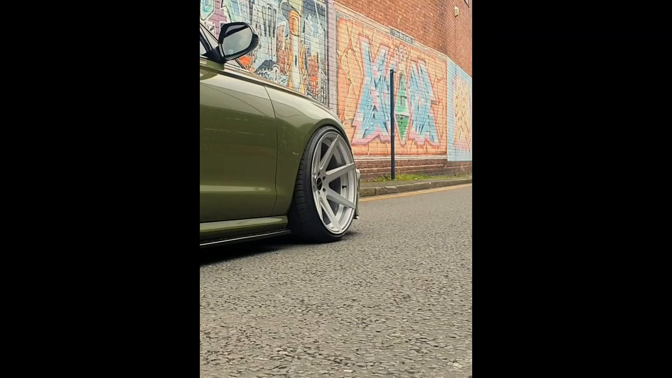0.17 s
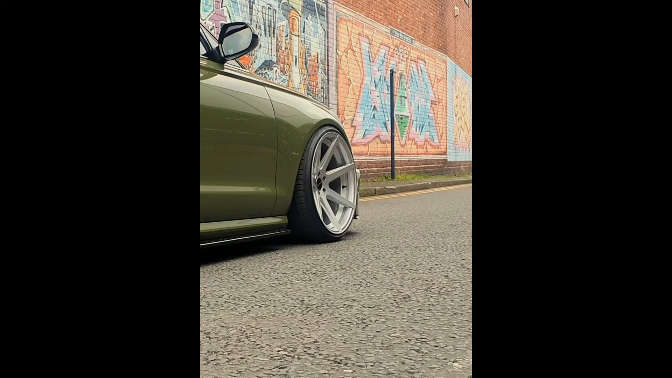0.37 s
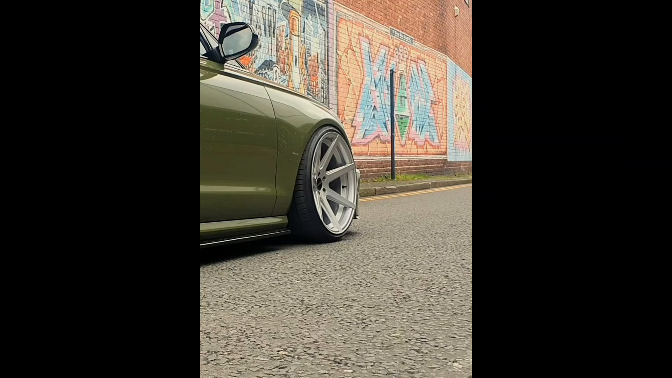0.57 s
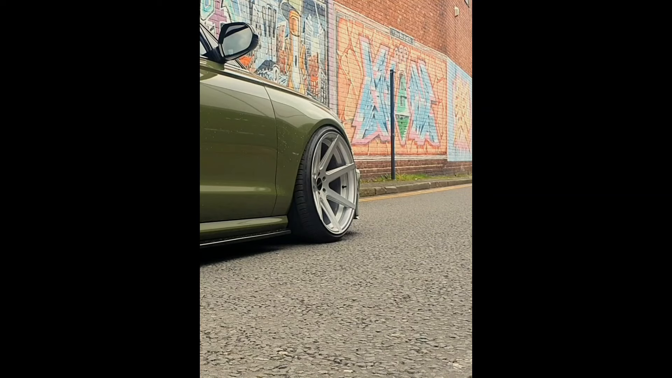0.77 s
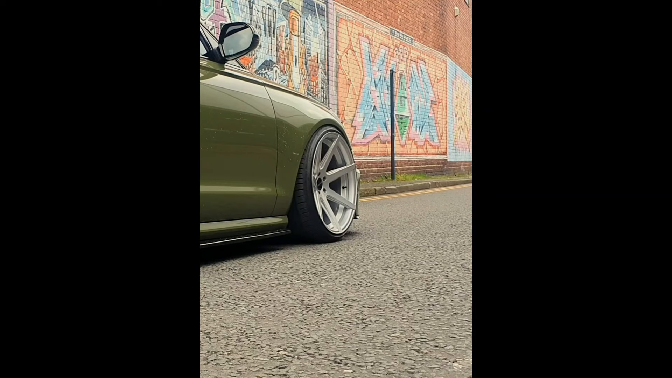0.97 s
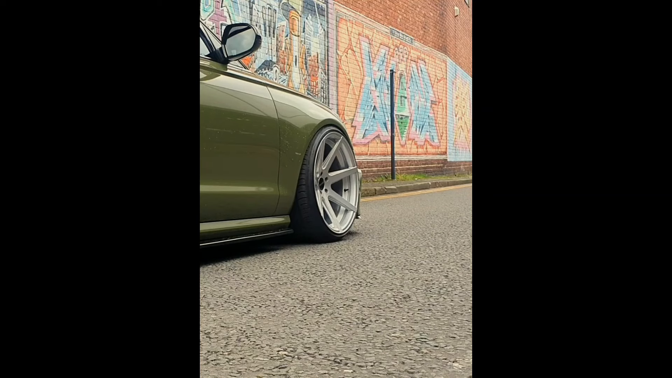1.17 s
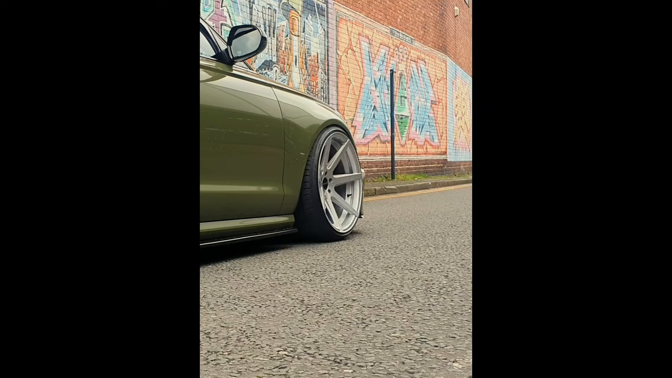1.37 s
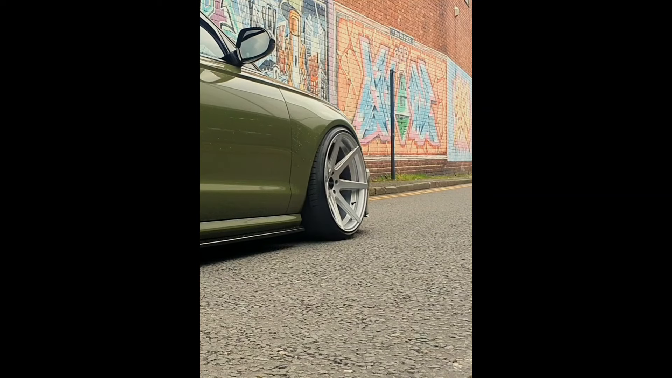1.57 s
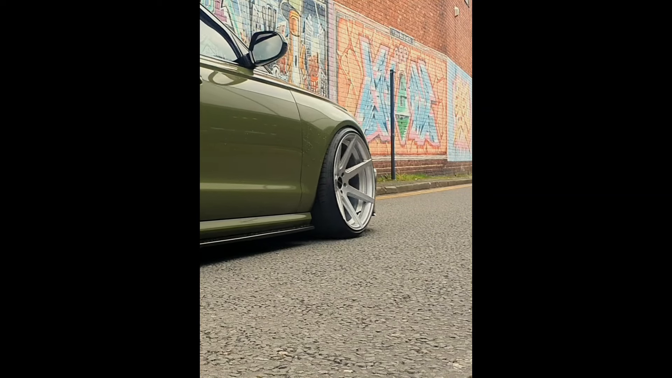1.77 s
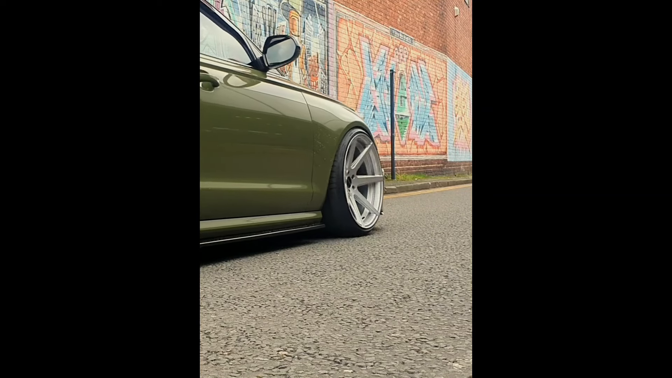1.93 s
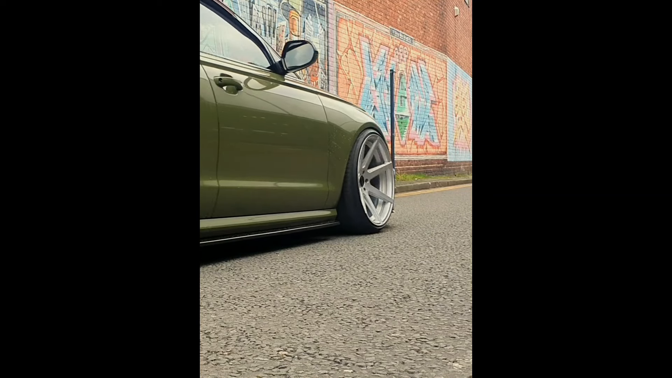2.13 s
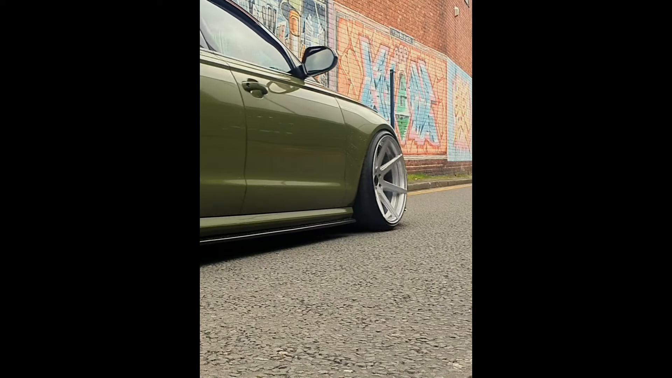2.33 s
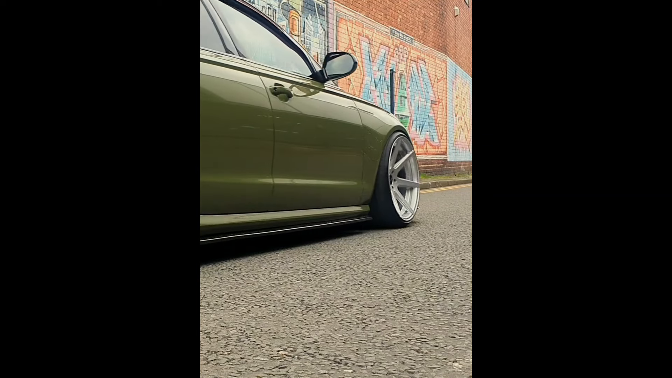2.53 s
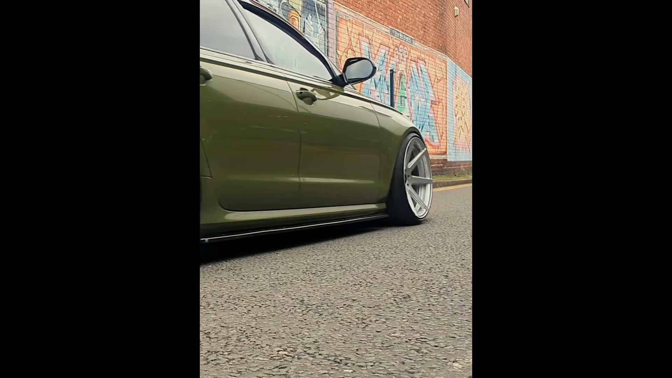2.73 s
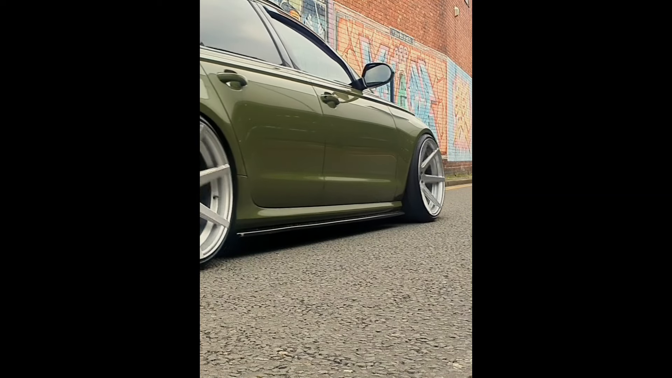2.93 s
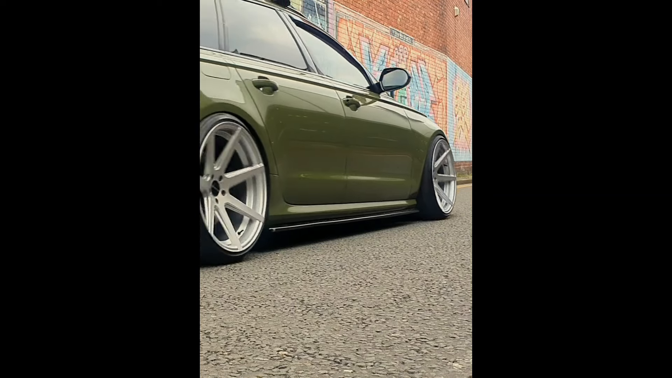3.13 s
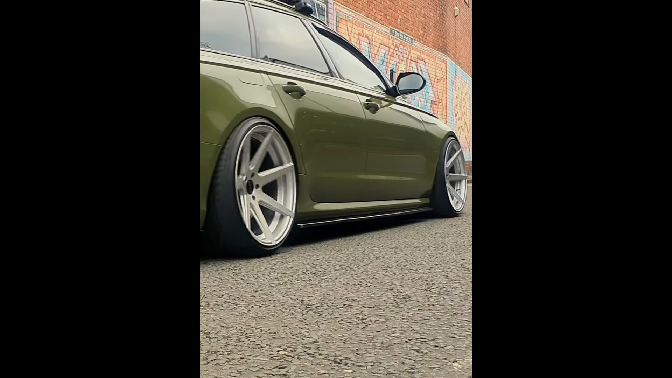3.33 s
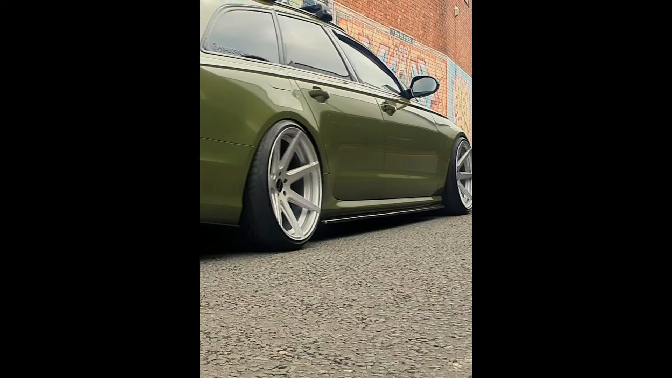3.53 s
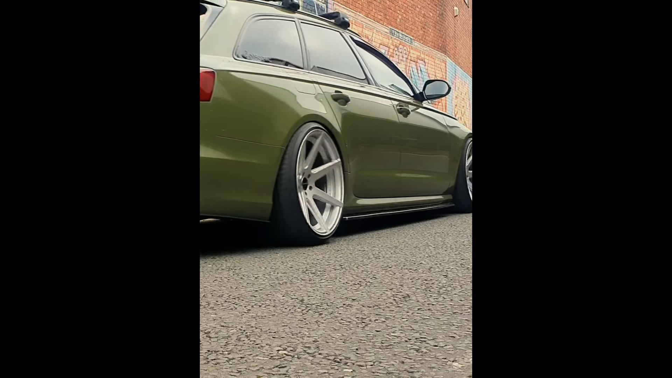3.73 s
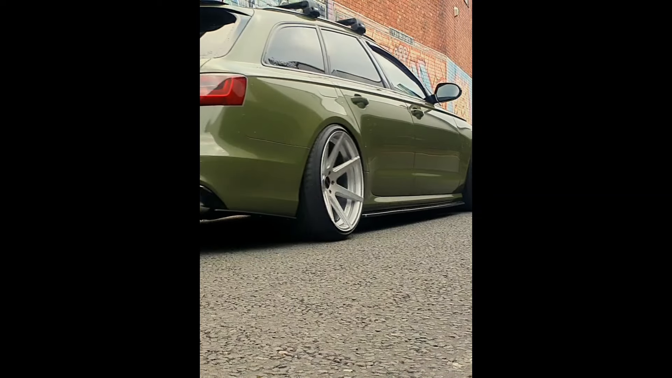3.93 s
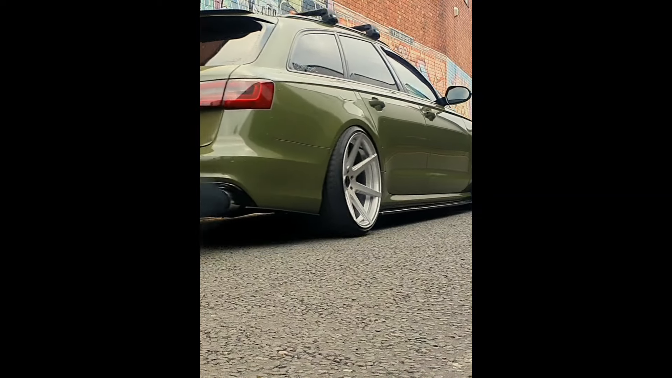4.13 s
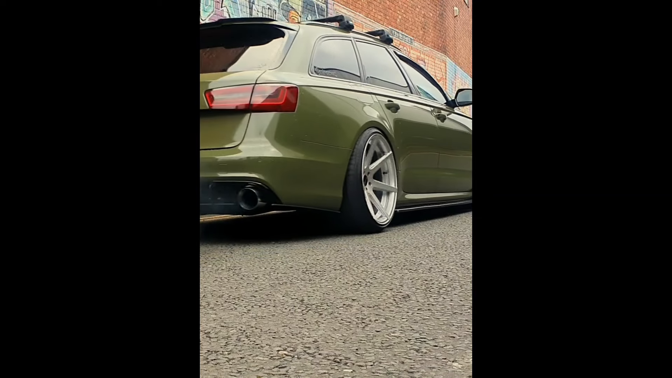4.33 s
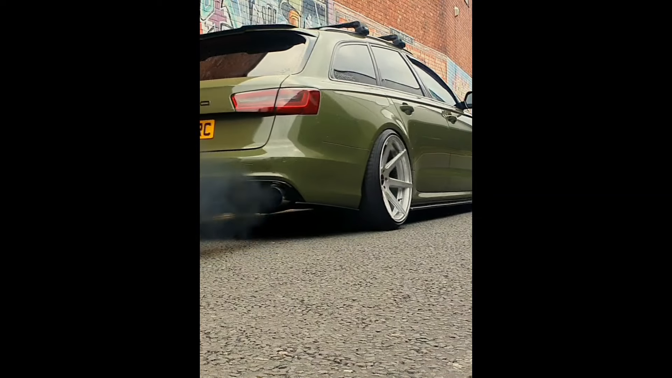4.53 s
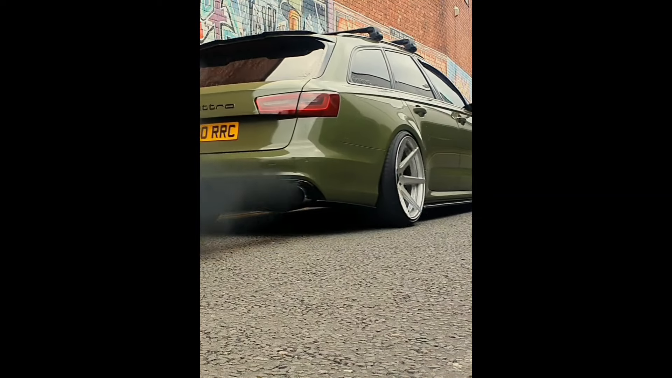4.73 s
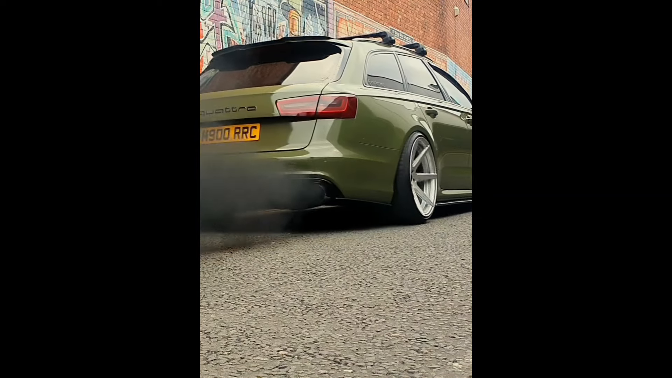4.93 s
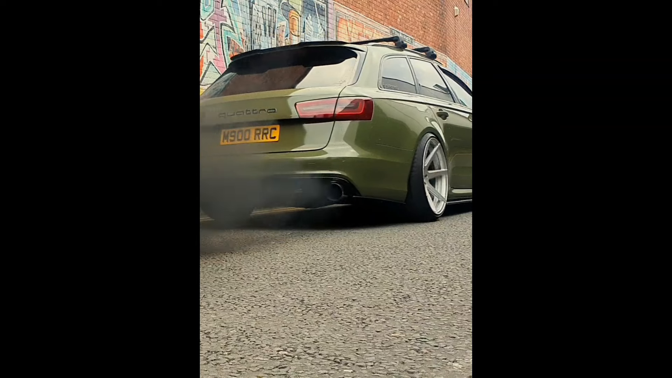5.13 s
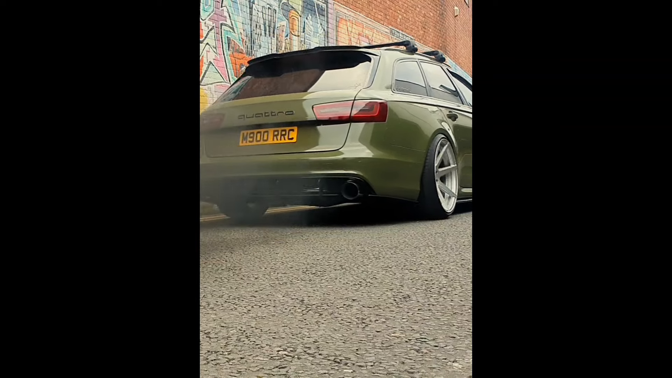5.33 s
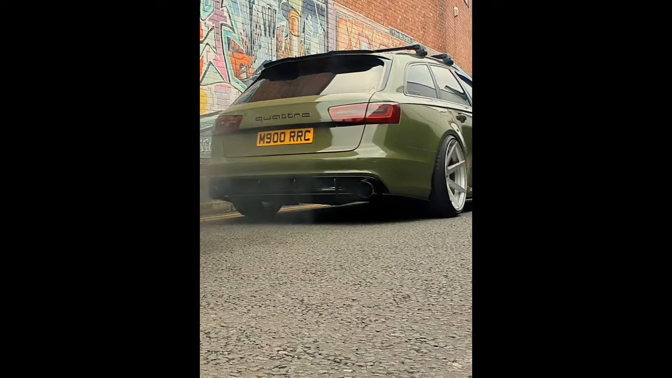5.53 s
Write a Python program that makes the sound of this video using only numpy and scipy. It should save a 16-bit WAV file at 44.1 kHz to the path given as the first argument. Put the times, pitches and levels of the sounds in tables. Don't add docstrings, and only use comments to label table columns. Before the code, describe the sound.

From 0 s a diesel car idles slowly past in a walled street, heard close in stereo. The open exhaust gives a deep, pulsing drone, strongest around 166 Hz, with soft metallic clatter, whining covers, rushing gas and low road rumble. A tiny grit snap comes at 0.44 s. The drone grows nearer, falters around 1.9 s and dips lightly at 2.3-2.4 s, while a turbo hiss climbs until 3.2 s, then drops away as the load comes off. At about 3.45 s the pedal goes down: air gulps and the exhaust roars, its pitch racing up by 4.1 s. From 4.0 to 5.2 s the limiter makes it ragged and stuttering, with dozens of irregular thumping pops, sharp cracks and spitting tails. The roar then weakens and sinks slightly, before the firing catches cleaner and louder from 5.55 s, ending abruptly at about 5.7 s. Short dull echoes return from ground and walls.

```python
import sys
import numpy as np
from scipy import signal
from scipy.io import wavfile
from scipy.ndimage import map_coordinates

SR = 44100
rng = np.random.default_rng(int(sys.argv[2]) if len(sys.argv) > 2 else 0)


def invert_db(level):
    return 10 ** (np.asarray(level, dtype=float) / 20)


def pcm_store(signal):
    levels = np.round(np.clip(np.atleast_2d(signal), -1, 1) * 32767)
    wavfile.write(sys.argv[1], SR, levels.astype(np.int16).T)


N = 251237
T = np.arange(N) / SR

# time in seconds, firings in Hz, drone in dB.
IDLE = [(0, 41.5, -25), (.85, 42.03, -21.5), (1.22, 41.36, -19), (1.75, 40.65, -19), (1.92, 39.78, -17.5),
        (2.1, 40.79, -16.5), (2.3, 42.07, -17), (2.67, 43.78, -18.5), (3.15, 42.93, -21.5),
        (3.37, 44.3, -19.5), (3.44, 46.1, -17.5), (3.5, 54.38, -24.5)]
CYLINDERS = [0, -2, -1.5, -3, -4, 0.3]
# multiple, far level in dB, near level in dB,
# gain with the clutch in, in dB, gain in a stumble in dB.
IDLE_ORDERS = [(1, -58, -45, -14, 6.5), (2, -16.5, -6.5, 6.5, 1), (3, -18, -14.5, 13.5, -10.5),
               (4, 4.5, 0.5, 2, -13.5), (5, -25, -10, 5, 3.5), (6, -7, -16, 5.5, -2),
               (7, -17, -22, -12, -1.5), (8, -37.5, -24, -7, 13), (9, -43.5, -25.5, 6.5, -3),
               (10, -28.5, -26, -3, -5), (11, -45, -30, -12, 4)]
# time in seconds, half length in seconds, depth from 0 to 1.
STUMBLES = [
    (1.938, 0.083, 0.98),
    (2.283, 0.047, 0.65),
    (2.395, 0.031, 0.7),
]
# time in seconds, firings in Hz, exhaust in dB.
REV = [(3.44, 44.99, -23.5), (3.5, 59.36, -3), (3.552, 75.66, -1.5), (3.64, 102, 1), (3.808, 153.4, 1),
       (3.99, 215.6, 0), (4.11, 260.4, -3.5), (4.16, 246.3, -1), (4.25, 243.7, -6.5), (4.48, 243.4, -3),
       (4.7, 272.2, -6), (4.95, 275.5, -5), (5.24, 244.8, -9), (5.31, 239.6, -16.5), (5.48, 227.6, -13),
       (5.52, 224.5, -16.5), (5.6, 220, -7), (5.697, 228.1, -1)]
# time in seconds, share of even firings from 0 to 1.
EVEN_BURN = [(3.44, .92), (3.7, .77), (4.08, .84), (4.14, .5), (5.22, .5), (5.33, .8), (5.58, .97),
             (5.7, .99)]
# frequency in Hz, gain in dB.
LOWER_GAIN = [(60, -10), (100, -10.5), (128, -20), (190, -7), (400, -20.5), (490, -10.5), (600, -23),
              (680, -17)]
# frequency in Hz, gain in dB.
UPPER_GAIN = [(150, -23), (260, -21), (380, 9.5), (500, 14.5), (680, -3.5), (830, -16), (1000, -13.5),
              (1400, -25), (2200, -57.5), (3200, -41.5), (5500, -52.5)]
# frequency in Hz, width in Hz, level in dB.
PIPE = [(193.2, 33, -2.5), (281, 13.3, 5), (482, 93, -2), (664, 195, -3.5), (985, 115, -11),
        (1500, 133, -15.5), (1890, 110, -16.5)]
# time in seconds, crack in dB, thump relative to the crack in dB.
POPS = [(4.0024, -22, 24.5), (4.0127, -14.5, 12), (4.0736, -26.5, 26.5), (4.0971, -40, 20), (4.13, -53, -8),
        (4.1684, -34.5, 31.5), (4.2079, -10, 13.5), (4.2553, -15, 8), (4.353, -14.5, 12.5),
        (4.3846, -30, -5), (4.3994, -18.5, 17), (4.435, -58, -3), (4.5226, -12, 4), (4.5377, -17, 10),
        (4.6098, -11.5, 11.5), (4.6546, -12, -21), (4.6713, -15.5, 6), (4.723, -22, 6), (4.7679, -9.5, 2),
        (4.8284, -18, 21), (4.8779, -19, 7.5), (4.8959, -11.5, 13), (4.948, -19, -2), (4.97, -12.5, -14),
        (5.0147, -18, 8), (5.0332, -16, 16), (5.0883, -21.5, 18.5), (5.1147, -13.5, 11), (5.1528, -8, 5.5),
        (5.2084, -18, 11)]
# frequency in Hz, width in Hz, level in dB.
TAILPIPE = [(578.5, 94.5, -4.5), (1160, 170, -17), (285, 30, -6)]
# time in seconds, relative level in dB.
FACING = [(4.1, -37), (4.2, -31.5), (4.55, -24), (5.25, -26.5)]
# time in seconds, share of full flow.
FLOW = [(0, -.15), (.5, 0.14), (2.0, 0.16), (3.18, 0.19), (3.44, 0.14), (3.5, 1), (3.7, 0.69), (3.85, 0.47),
        (3.94, 0.33), (4.02, 1.0), (4.34, 0.87), (4.7, 0.93), (5.1, 0.92), (5.22, 0.81), (5.36, 0.68),
        (5.6, 0.44), (5.7, 1)]
# idle level in dB, rise at full flow in dB, change with the clutch in, in dB,
# change in the pedal kick in dB, rise with revs in dB.
LAYERS = [
    (-40, 19, 1, -7.5, 0),
    (-46.5, 12.5, -7.5, -2, 1.5),
    (-57.5, 22, -4.5, 0, 1),
    (-76, 13.5, -10, 14.5, 5),
    (-29, 1, 3.5, 9.5, -25.5),
]
# frequency in Hz, level in dB per Hz.
RUSH = [(180, -27.5), (300, -0.5), (360, -27.5), (437, -5), (557, -11), (621, -7.5), (1500, -20.5),
        (1950, -71.5), (3300, -120)]
# frequency in Hz, level in dB per Hz.
CLATTER = [(650, -36), (1100, -6.5), (1270, -11), (2010, -2), (2510, -2.5), (3230, -15), (3620, -18),
           (4500, -15), (5850, -49), (9900, -120)]
# frequency in Hz, level in dB per Hz.
JET = [(1290, -34), (2200, -18.5), (2630, -12.5), (3210, 3), (4160, -1.5), (5280, -0.5), (5980, -9),
       (8000, -48), (10400, -58.5), (17600, -120)]
# frequency in Hz, level in dB per Hz.
TOP = [(4410, -37.5), (7500, -9), (10500, 0.5), (13900, -4), (16200, -8.5), (16500, -53)]
# frequency in Hz, level in dB per Hz.
RUMBLE = [(15, -51), (25, -21.5), (64, -5), (112, -16.5), (167, -1), (270, -22.5), (339, -28), (600, -46),
          (780, -66.5), (1320, -120)]
# frequency in Hz, width in Hz, level in dB.
WHINES = [(1648, 24, 2), (2013, 120, -4.5), (2350, 55, -23), (2816, 30, -1.5), (3214, 86, -2.5),
          (5580, 90, -19.5)]
# time in seconds, share.
WHINE_SWELL = [(1.7, 0.045), (2.2, .8), (2.75, 1), (2.95, 0)]
# time in seconds, share.
WHINE_FADE = [(2.1, 1), (2.8, .35)]
# frequency in Hz, width in Hz, level in dB.
INTAKE = [(1320, 300, 0), (3300, 500, 0), (5600, 900, -2)]
# time in seconds, upper edge in Hz, level in dB.
TURBO = [(0, 3410, -55.5), (1.9, 3403, -65.5), (2.3, 3900, -51), (2.7, 4680, -53), (3.15, 5390, -54.5),
         (3.2, 5560, -55), (3.23, 5430, -70)]
# time in seconds, level in dB.
TICK = [
    (0.44, -45),
]
# time in seconds, lag of the left ear in samples, left minus right in dB.
PASSING = [(0, -18.5, 1), (1.7, -18.5, 0.7), (2.7, -12.5, 1.2), (3.7, -3.5, 0.6), (4.7, 7.5, 0.8),
           (5.7, 1.5, 0.5)]
# delay in seconds, left level in dB, right level in dB.
ECHOES = [(.0031, -21.5, -27.5), (0.014, -5.5, -9.5), (0.024, -29, -26.5), (.047, -19, -20.5),
          (0.083, -19, -20)]
# frequency in Hz, likeness from 0 to 1.
LIKENESS = [(60, 1), (500, 0.7), (1000, 0.5), (2500, 0.1), (15000, 0)]

CLUTCH_S, THROTTLE_S = 3.2, 3.8
KICK_S, KICK_ATTACK_S, KICK_HOLD_S, KICK_FALL_S = 3.46, .07, .15, .07
CATCH_S, CATCH_STEP_DB, CATCH_UPPER_DB = 5.55, 7.0, 8.0
UPPER_DB, UPPER_DB_PER_OCTAVE, RAGGED_DB, RAGGED_DB_PER_OCTAVE = -24, 14.5, -13.5, 7.5
HUNT_TURNS = .6
CRACK_DB, THUMP_DB, BODY_DB, PUSH_DB = 6.5, 5, -3.5, 61.5
ROUND_TRIP_S = 0.0047
CUT_SHARE, AFTERBURN_S = .42, .025
CLEAN_FOLLOWS = .3
WHINE_HZ = 41.5
INTAKE_DB, INTAKE_KICK_DB = -42, 10


def idle():
    gate, firing_hz, drone_db = in_time(IDLE)
    turns = np.cumsum(firing_hz) / SR
    near, free = np.clip(T / CLUTCH_S, 0, 1), clutch_in()
    stumble = sum(depth * np.exp(-((T - s) / half_s) ** 2) for s, half_s, depth in STUMBLES)
    drone = 0
    for k, far_db, near_db, free_db, stumble_db in IDLE_ORDERS:
        k = round(k)
        level_db = drone_db + far_db + (near_db - far_db) * near + free_db * free + stumble_db * stumble
        firings_db = np.roll(np.tile(CYLINDERS, 300), k // 2) + 0.5 * rng.standard_normal(1800)
        uneven_db = per_firing(firings_db, turns) + (k != 4) * 1.7 * drift(4.0)
        phase = 2 * np.pi * k * turns + 0.63 * k * k + 0.36 * drift(9.1)
        drone = drone + invert_db(level_db + uneven_db) * np.cos(phase)
    return np.sqrt(2) * gate * drone, turns


def rev():
    gate, firing_hz, level_db = in_time(REV)
    octaves = np.log2(firing_hz / 220)
    ragged_db = level_db + RAGGED_DB + RAGGED_DB_PER_OCTAVE * octaves
    even, burn = in_time(EVEN_BURN)[1], afterburn()
    turns = np.cumsum(firing_hz) / SR
    turns = turns + HUNT_TURNS * (1 - even) ** 1.5 * drift(14)
    spread_db = 5.5 * np.sqrt(1 - even)
    caught = np.clip((T - CATCH_S) / 0.19, 0, 1)

    clean = np.zeros(N)
    for k in (1, 2, 3):
        order_db = level_db + at_hz(LOWER_GAIN, k * firing_hz) - CATCH_STEP_DB * caught * (k == 1)
        order_db = order_db + .6 * spread_db * drift(18)
        clean += invert_db(order_db) * np.cos(2 * np.pi * k * turns + 1.35 - 70 / (k * firing_hz))
    upper_db = level_db + UPPER_DB + UPPER_DB_PER_OCTAVE * octaves + CATCH_UPPER_DB * caught
    slip = .05 * drift(60) - .08
    on = gate > 0
    for k in range(4, 19):
        order_db = (upper_db + spread_db * drift(20))[on] + 13 + at_hz(UPPER_GAIN, k * firing_hz[on])
        wave = np.cos(k * (2 * np.pi * turns + slip)[on] + 1.0)
        clean[on] += even[on] ** 2 * invert_db(order_db) * wave
    banks_db = .3 * np.cos(np.pi * turns) + .8 * per_firing(rng.standard_normal(1800), turns)
    clean *= np.sqrt(2) * burn ** CLEAN_FOLLOWS * invert_db(spread_db * (0.57 * drift(30) + banks_db))
    below = signal.sosfiltfilt(signal.butter(2, 110, fs=SR, output="sos"), clean)
    clean -= below * np.clip((firing_hz - 130) / 40, 0, 1)

    strength = invert_db(2.1 * per_firing(rng.standard_normal(1800), turns))
    puffs = rng.standard_normal(N) * np.exp(-4.0 * (turns % 1)) * strength
    ragged = invert_db(ragged_db - 1.0) * burn * rms_one(pipe(puffs))
    return gate * (even * clean + np.sqrt(1 - even ** 2) * ragged), turns


def pipe(x):
    return resonate(band(band(x, 90, 2000), 82, 4200), PIPE)


def pops():
    s, crack_db, thump_db = np.transpose(POPS)
    crack_db = crack_db + CRACK_DB
    top_db = crack_db + np.interp(s, *np.transpose(FACING))
    heavy = pop_hits(crack_db + thump_db + THUMP_DB, -1.5)
    thump = invert_db(2) * resonate(signal.lfilter(np.hanning(14), 1, heavy), TAILPIPE)
    push = invert_db(PUSH_DB) * band(pop_hits(top_db, -1.5), 50, 86)
    hits, high = pop_hits(crack_db, -5), pop_hits(top_db, -2)
    front = invert_db(5) * band(fall(hits, .0002), 1500, 6500)

    white = wide_noise(.8)
    body = white * (fall(hits, 0.0032) + invert_db(-11.5) * fall(hits, 0.036))
    crack = white * (invert_db(-2) * fall(hits, .0006) + invert_db(-23) * fall(hits, .009))
    top = white * (invert_db(3) * fall(high, .001) + invert_db(-12) * fall(high, .018))
    cracks = invert_db(BODY_DB) * band(body, 690, 1730) + band(crack, 3680, 6450) * invert_db([[-2.5], [1.5]])
    return thump + push + front, cracks + band(top, 8000, 17000)


def pop_hits(levels_db, back_db):
    hits, at = np.zeros(N), (np.array(POPS)[:, 0] * SR + 30).astype(int)
    chance = rng.standard_normal((len(at), 3))
    for trip in range(3):
        trip_db = levels_db + trip * (back_db + 1.5 * chance[:, trip])
        np.add.at(hits, at + int(trip * ROUND_TRIP_S * SR), invert_db(trip_db))
    return hits + 1e-18


def afterburn():
    cut = (T > 4.15) & (T < 5.27)
    burning = fall(pop_hits(np.array(POPS)[:, 1] + 17, -40), AFTERBURN_S)
    return np.where(cut, CUT_SHARE + burning, 1)


def clutch_in():
    return np.interp(T, [CLUTCH_S, CLUTCH_S + 0.036, KICK_S - .03, KICK_S], [0, 1, 1, 0])


def pedal_kick():
    rise = np.clip((T - KICK_S) / KICK_ATTACK_S, 0, 1)
    since_hold = np.maximum(T - KICK_S - KICK_ATTACK_S - KICK_HOLD_S, 0)
    return rise, rise * np.exp(-since_hold / KICK_FALL_S)


def layer_levels():
    revs = np.clip((in_time(REV)[1] - 50) / 130, 0, 1)
    return np.array(LAYERS) @ [np.ones(N), in_time(FLOW)[1], clutch_in(), pedal_kick()[1], revs]


def air(idle_turns, rev_turns):
    rush_db, clatter_db, jet_db, top_db, _ = layer_levels()
    rush = invert_db(rush_db) * banded_noise(RUSH, patchy_db=2.0)
    jet = invert_db(jet_db + [[-1.5], [1.5]]) * banded_noise(JET, patchy_db=.8)
    top = invert_db(top_db) * banded_noise(TOP, patchy_db=1.5)
    beating = rush + invert_db(clatter_db) * clatter(idle_turns) + jet
    return afterburn() * (firing_beat(idle_turns, rev_turns) * beating + top)


def firing_beat(idle_turns, rev_turns):
    turns = np.where(T < THROTTLE_S, idle_turns, rev_turns)
    depth = np.interp(T, [3.7, 3.85], [.1, .45])
    strength = invert_db(2.5 * per_firing(rng.standard_normal(1800), turns))
    return 1 - depth + 2.5 * depth * np.cos(np.pi * turns) ** 4 * strength


def clatter(idle_turns):
    knock = banded_noise(CLATTER, patchy_db=3.34)
    at_idle = 0.88 * knock + 1.1 * cover_whine(idle_turns)
    return np.where(T < THROTTLE_S, at_idle, 1.01 * band(knock, 700, 2610))


def cover_whine(idle_turns):
    source = wide_noise(.7)
    covers = rms_one(band(resonate(source, WHINES), 1500, 5800))
    passing = rms_one(resonate(source, WHINES[3:4]))
    fade, swell = [np.interp(T, *np.transpose(rows)) for rows in (WHINE_FADE, WHINE_SWELL)]
    whine = covers * fade + .5 * passing * swell
    return np.array([np.interp(idle_turns / WHINE_HZ, T, side) for side in whine])


def intake():
    rise, kick = pedal_kick()
    load = rise * np.interp(T, [4.0, 4.15, CATCH_S, 5.7], [1, 0, 0, 1.2])
    roar = rms_one(resonate(resonate(wide_noise(.8), INTAKE), INTAKE))
    return load * invert_db(INTAKE_DB + INTAKE_KICK_DB * kick + 1.5 * drift(25)) * roar


def turbo():
    gate, edge_hz, level_db = in_time(TURBO)
    flutter = signal.sosfilt(signal.butter(4, 600, fs=SR, output="sos"), wide_noise(0.52))
    carrier = np.cos(2 * np.pi * np.cumsum(edge_hz - 600) / SR)
    return gate * invert_db(level_db) * rms_one(flutter * carrier)


def tick():
    s, level_db = TICK[0]
    snap, tail = [(T >= s) * np.exp(-np.abs(T - s) / decay_s) for decay_s in (.003, .12)]
    white = wide_noise(.7)
    grit = invert_db(4) * band(white * tail, 3700, 5200)
    return invert_db(level_db) * (band(white * snap + 1e-18, 2500, 15500) + grit)


def road_rumble():
    return invert_db(layer_levels()[4]) * afterburn() * banded_noise(RUMBLE, patchy_db=2.0)


def street(x):
    _, lag, pan_db = in_time(PASSING)
    n = np.arange(N)
    left = map_coordinates(x[0], [n - np.maximum(lag, 0)], order=3, mode="nearest")
    right = map_coordinates(x[1], [n + np.minimum(lag, 0)], order=3, mode="nearest")
    return np.array([invert_db(pan_db / 2) * left, invert_db(-pan_db / 2) * right])


def echoes(x):
    thin = band(x, 320, 1600)
    out = 0
    for s, left_db, right_db in ECHOES:
        late = np.array([np.interp(T - s, T, thin), np.interp(T - 1.13 * s, T, thin)])
        out = out + invert_db([[left_db], [right_db]]) * late
    return out


def banded_noise(spectrum, patchy_db):
    low_end, top_end = np.log2(spectrum[0][0]), np.log2(spectrum[-1][0])
    edges = 2 ** np.linspace(low_end, top_end, int(3 * (top_end - low_end)) + 3)
    out, white = 0, rng.standard_normal((2, 2, N))
    for k, (low, high) in enumerate(zip(edges, edges[1:])):
        middle_hz = np.sqrt(low * high)
        level_db = at_hz(spectrum, middle_hz)
        if level_db < -55:
            continue
        mid, side = band(white[k % 2], low, high)
        alike = at_hz(LIKENESS, middle_hz)
        stereo = np.sqrt(1 + alike) * mid + np.sqrt(1 - alike) * side * [[1], [-1]]
        out = out + invert_db(level_db + patchy_db * drift(9)) * stereo
    return rms_one(out)


def wide_noise(apart):
    return rng.standard_normal(N) + apart * rng.standard_normal((2, N))


def resonate(x, modes):
    out = 0
    for k, (hz, width, level_db) in enumerate(modes):
        r = np.exp(-np.pi * width / SR)
        poles = [1, -2 * r * np.cos(2 * np.pi * hz / SR), r * r]
        ringing = signal.lfilter([1 - r * r, 0, r * r - 1], poles, x + 1e-18)
        out = out + (-1) ** k * invert_db(level_db) * ringing
    return out


def band(x, low_hz, high_hz):
    return signal.sosfilt(signal.butter(2, [low_hz, high_hz], "band", fs=SR, output="sos"), x)


def fall(hits, decay_s):
    return signal.lfilter([1], [1, -np.exp(-1 / (decay_s * SR))], hits)


def drift(rate):
    steps, coarse = rng.standard_normal(2000), T[::32]
    curve = map_coordinates(steps, [coarse * rate * 2 + 5], order=3)
    return rms_one(np.interp(T, coarse, curve))


def per_firing(values, turns):
    return np.interp(turns, np.arange(len(values)), values)


def in_time(rows, fade_s=0.077):
    s, *columns = np.transpose(rows)
    gate = np.interp(T, [s[0] - fade_s, s[0], s[-1], s[-1] + fade_s], [0, 1, 1, 0])
    return [gate] + [np.interp(T, s, column) for column in columns]


def at_hz(points, hz):
    table_hz, level = np.transpose(points)
    return np.interp(np.log(hz), np.log(table_hz), level)


def rms_one(x):
    return x / np.sqrt(np.mean(x ** 2) + 1e-20)


def scene():
    drone, idle_turns = idle()
    roar, rev_turns = rev()
    thump, cracks = pops()
    exhaust = drone + roar + thump
    engine = exhaust + cracks + air(idle_turns, rev_turns) + intake() + turbo()
    return street(engine + tick() + road_rumble()) + echoes(exhaust)


def low_pass(x):
    return signal.sosfilt(signal.butter(12, 16830, fs=SR, output="sos"), x)


def record(dry):
    rounded = np.tanh(dry) * np.clip((T[-1] - T) / .004, 0, 1)
    wet = signal.sosfilt(signal.butter(2, 45, "high", fs=SR, output="sos"), rounded)
    wet = wet - 0.49 * band(wet, 6640, 9550)
    wet = signal.sosfilt(signal.cheby2(10, 60, 17100, fs=SR, output="sos"), wet)
    return low_pass(wet)


dry = scene()
out = record(dry)
pcm_store(out)
```